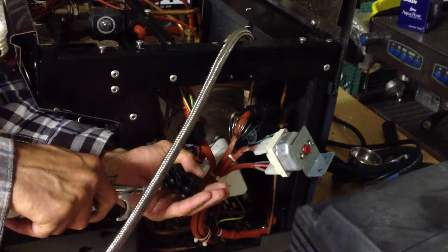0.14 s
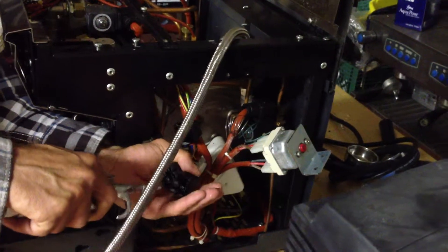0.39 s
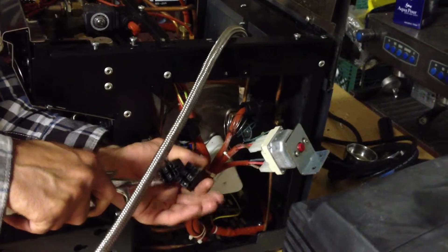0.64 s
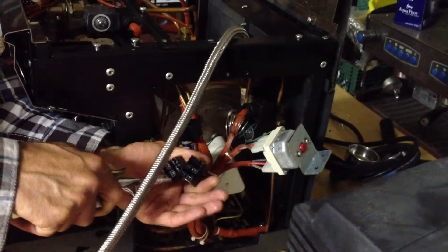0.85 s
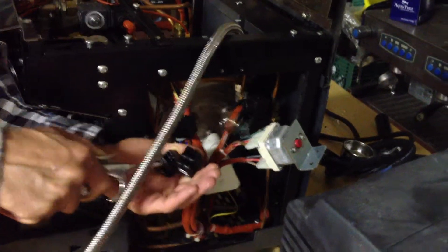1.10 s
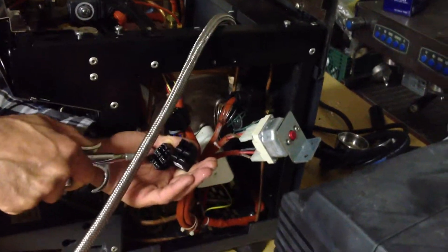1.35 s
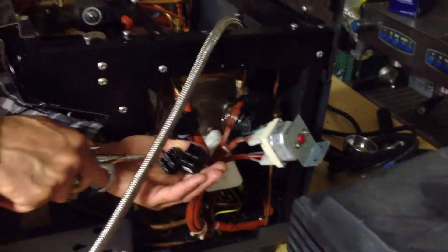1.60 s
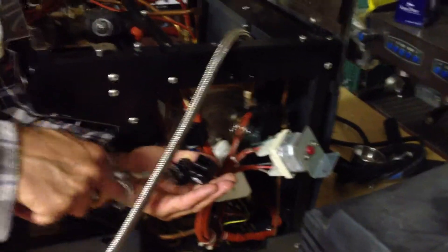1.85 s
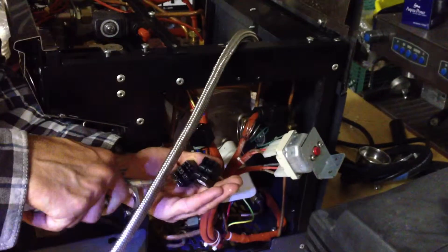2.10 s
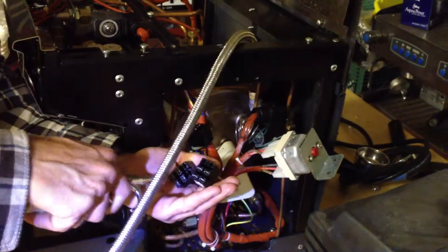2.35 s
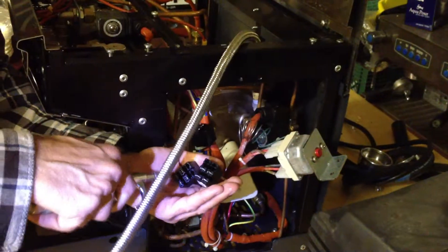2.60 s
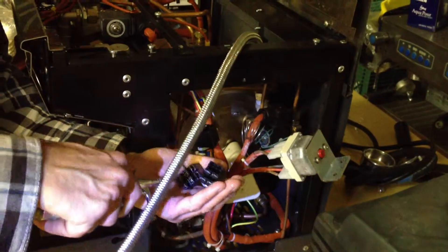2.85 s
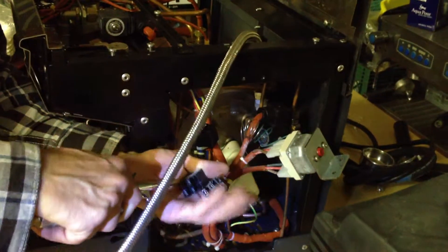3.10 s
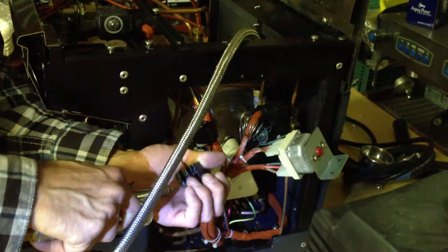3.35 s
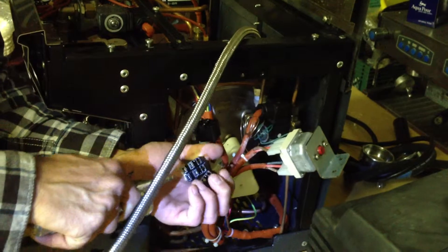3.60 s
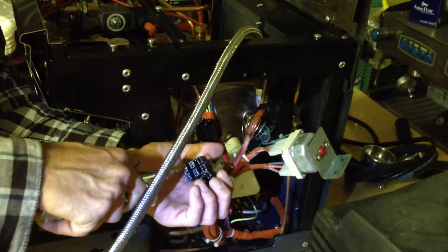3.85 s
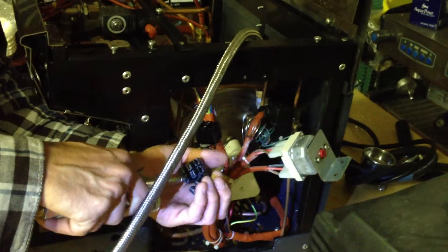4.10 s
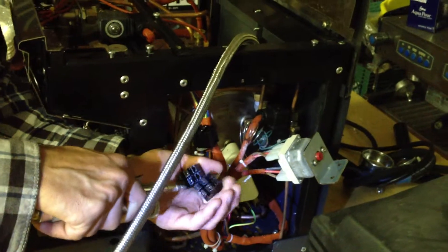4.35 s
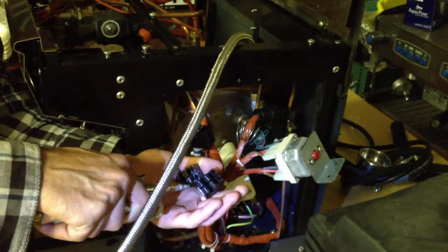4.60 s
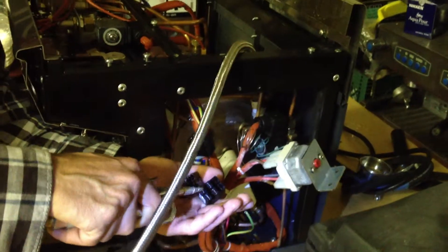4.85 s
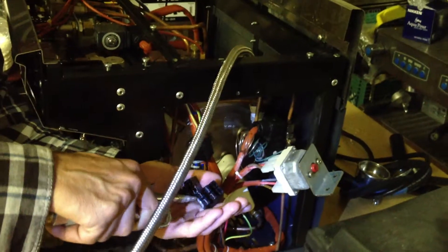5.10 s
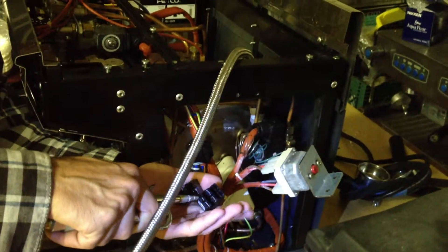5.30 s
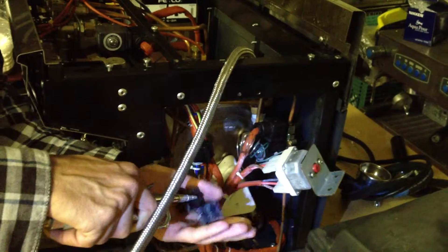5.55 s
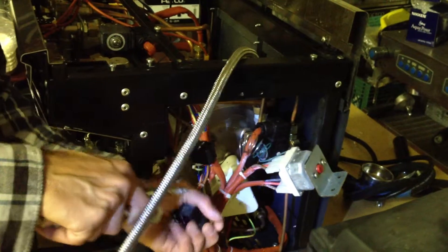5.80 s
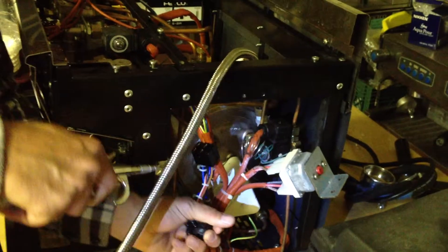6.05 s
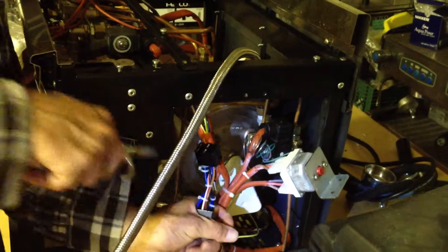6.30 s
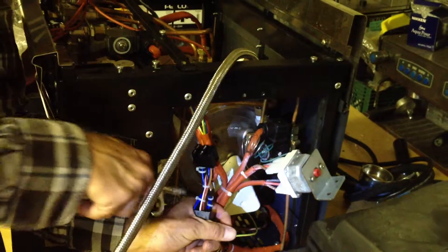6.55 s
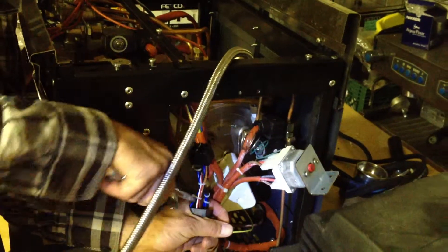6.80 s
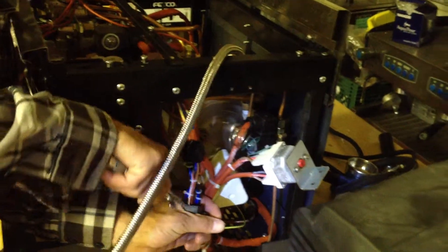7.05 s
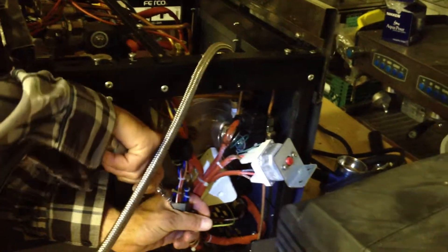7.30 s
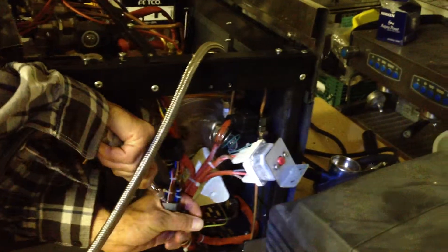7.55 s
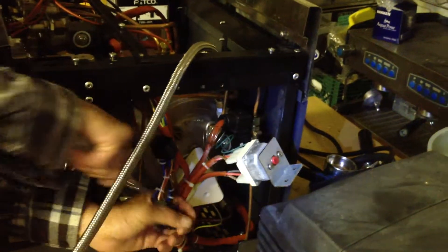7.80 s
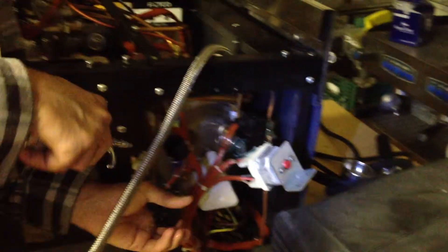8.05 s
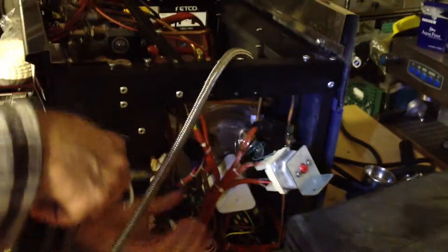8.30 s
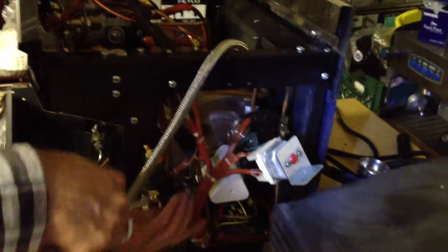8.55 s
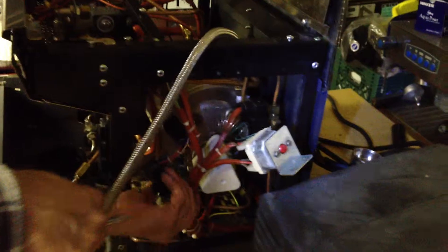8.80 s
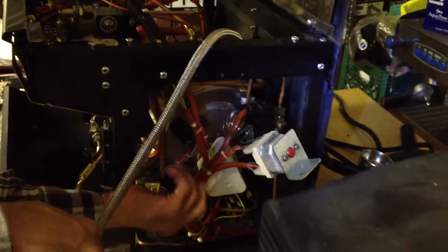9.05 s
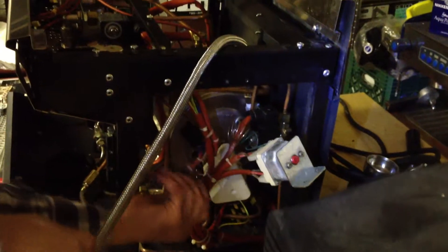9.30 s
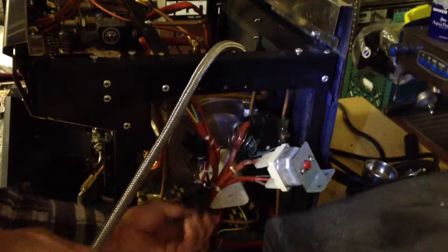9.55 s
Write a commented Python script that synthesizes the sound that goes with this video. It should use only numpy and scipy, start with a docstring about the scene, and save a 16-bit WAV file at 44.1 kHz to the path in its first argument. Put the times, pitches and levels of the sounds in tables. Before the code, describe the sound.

A workshop heard through one close mono microphone with automatic gain and little deep bass. Throughout, a compressor runs at constant speed, about forty-two knocks a second, fused into a coarse buzzing drone with throbbing rattle, ringing panels and faint high whines. From 0 s a blow gun sprays a small part with strong, bright, fluttering hiss, pushing the compressor back. Low gusts thump the microphone, and a short high whistle slips out around 0.7-0.95 s. From 2 to 5.5 s the jet comes in quick, uneven swells, some hollow and roaring, with crackly pops near 2.6-2.8 s and a broad surge about 4.9 s. Around 5.7-6.5 s it weakens and the rattle comes forward. Shorter spurts follow, with a breathy whistle at 6.8-7 s and sharp puffs at 7.5-7.8 s. The air fades out by about 8.5 s, leaving the clearer compressor knocking steadily until 9.7 s.

```python
"""Workshop: an air compressor knocks away steadily while a blow gun sprays a small hand-held part.
Compressor: harmonics of the shaft speed make the knock, over throbbing noise, ringing panels and thin whines.
Jet: coloured noises swell and change colour over edges and hollows, whistle now and then, die near the end.
Gusts: low noise lumps and tiny pops. A mono microphone with gain control ducks the compressor under the jet."""
import sys
import numpy as np
from scipy import signal
from scipy.io import wavfile
from scipy.ndimage import uniform_filter1d

SR = 44100
rng = np.random.default_rng(int(sys.argv[2]) if len(sys.argv) > 2 else 0)


def voltage_ratio(decibels):
    """Convert decibels (scalar or array-like) to amplitude ratios, 20 dB per decade."""
    exponent = np.asarray(decibels, float) / 20
    return 10 ** exponent


def inscribe(sig):
    """Save sig as 16-bit PCM at rate SR to the path in sys.argv[1].

    A 1-D sig is mono; a 2-D sig holds one channel per row.
    Samples are clipped to [-1, 1] before scaling.
    """
    pcm = np.round(np.clip(np.atleast_2d(sig).T, -1, 1) * 32767)
    wavfile.write(sys.argv[1], SR, pcm.astype(np.int16))


N = 426006
CONTROL_HZ = 100  # rate of slow control rows


def evened(x):
    """Scales to rms 1."""
    return x / np.sqrt(np.mean(x ** 2) + 1e-20)


def read_spectrum(points, hz):
    """Reads a spectrum on a log-frequency axis; -80 dB below its first point."""
    point_hz, level_db = np.transpose(points)
    return np.interp(np.log(hz + 1), np.log(point_hz + 1), level_db, left=-80)


def resonate(x, hz, width_hz):
    """Resonance: shifts hz down to zero, smooths twice (width_hz per pass), shifts back."""
    turn = np.exp(2j * np.pi * np.cumsum(hz * np.ones(len(x))) / SR)
    r = np.exp(-np.pi * width_hz / SR)
    low = signal.lfilter([1 - r], [1, -r], x / turn)
    low = signal.lfilter([1 - r], [1, -r], low)
    return 2 * (turn * low).real


def wander(corner_hz, count):
    """Slow random rows at CONTROL_HZ, rms 1 overall: white noise low-passed both ways."""
    raw = rng.standard_normal((N * CONTROL_HZ // SR + 2, count))
    b, a = signal.butter(1, np.clip(corner_hz / (CONTROL_HZ / 2), .001, .9))
    return evened(signal.filtfilt(b, a, raw, axis=0, padtype="even")).T


def spread(row):
    """Stretches a slow row to every sample."""
    return np.interp(np.arange(N) * CONTROL_HZ / SR, np.arange(len(row)), row)


def noise(spectrum, patchy_db, bins, frames, streaky_db=0.5):
    """Random short-time spectra with drifting patches and thin streaks from nearby echoes, rms 1."""
    hz = np.fft.rfftfreq(512, 1 / SR)
    real, imag, patches, streaks = rng.standard_normal((N // 128 + 5, 257, 4)).T
    patches = uniform_filter1d(uniform_filter1d(patches, size=bins, axis=0), size=frames, axis=1)
    streaks = uniform_filter1d(uniform_filter1d(streaks, size=2, axis=0), size=70, axis=1)
    field_db = read_spectrum(spectrum, hz)[:, None]
    field_db = field_db + patchy_db * evened(patches) + streaky_db * evened(streaks)
    spectra = (real + 1j * imag) * voltage_ratio(field_db)
    return evened(signal.istft(spectra, nperseg=512, noverlap=384)[1][:N])


def no_bass(x, hz):
    """Small sources radiate no bass."""
    return signal.sosfilt(signal.butter(4, hz, "high", fs=SR, output="sos"), x)


# shaft speed: time_s, speed_turns_per_s
SHAFT_SPEED = [(0.0, 41.801), (0.8, 41.821), (1.5, 41.79), (2.1, 41.766), (2.7, 41.823), (3.4, 41.844),
               (4.2, 41.819), (5.0, 41.801), (5.8, 41.82), (6.6, 41.831), (7.4, 41.842), (8.2, 41.846),
               (9.0, 41.869), (9.66, 41.869)]
# knock, a row per multiple 1, 2, 3 .. of shaft speed, before path gain and waver:
# shaded_db (rms, behind arm and hands), clear_db (rms, clear path)
KNOCK_ORDERS = [(-58, -58), (-50, -51), (-36, -38), (-37, -40), (-29, -30), (-37, -36), (-37, -38),
                (-35, -37), (-28, -34), (-39, -45), (-40, -46), (-39, -38), (-33, -34), (-39, -36),
                (-31, -32), (-38, -40), (-31, -31), (-25, -27), (-32, -30), (-29, -26), (-38, -33),
                (-33, -38), (-34, -40), (-37, -61), (-40, -39), (-40, -41), (-31, -37), (-34, -36),
                (-41, -38), (-40, -47), (-42, -45), (-46, -48), (-32, -36), (-35, -36), (-41, -49),
                (-38, -44), (-48, -52), (-49, -51), (-43, -42), (-41, -49), (-45, -54), (-39, -43),
                (-40, -41), (-39, -48), (-42, -46), (-47, -45), (-46, -48), (-39, -39), (-41, -46),
                (-39, -40), (-40, -40), (-35, -34), (-49, -53), (-44, -48)]
# arm and hands move across the compressor's path: time_s, clear_share_0_1, knock_db, rattle_db, panels_db
PATH = [(0, 0.01, -0.9, 1, -1), (5.6, 0, -1, -1.5, -0.5), (5.9, 0.1, -1, 1, 0.1),
        (6.25, 0.1, 2.5, 4.5, 0.5), (6.8, 0.14, -1.3, 1.5, 7), (7.9, 0.05, -0.4, 2, -2),
        (8.25, 0.5, -0.5, 0, 1), (8.5, 1, -0.5, -1.5, -1.5), (8.9, 0.9, 0.2, 0.4, 0.3), (9.1, 0.9, 0, 0, 5),
        (9.35, 1, -0.1, -1.5, -1), (9.66, 0.8, 0, 0, 4.5)]
# air and rattle, relative spectrum: freq_hz, density_db_per_hz
RATTLE_SPECTRUM = [(59, -37), (100, -19), (213, -14), (376, -8), (454, -13), (836, -5.5), (930, -12),
                   (1300, -10.5), (2200, -8.5), (2490, -11.5), (3640, -13.5), (4890, -19), (9980, -41),
                   (13700, -17), (15200, -29)]
# casing panels ringing in the rattle, before path gain, swell and throb:
# pitch_hz, width_hz (per smoothing pass), level_db (rms), drift_hz (about rms)
CASING_PANELS = [(2155, 76, -34.5, 8.8), (2270, 96, -30.5, 14), (3677, 60, -39.5, 8)]
# casing whines, before swell: pitch_hz, level_db (peak)
CASING_WHINES = [(2498, -45), (2611, -45), (2697, -43), (2799, -42), (2929, -40), (2972, -44), (3085, -41),
                 (3305, -38), (3408, -38), (3521, -38), (3661, -36), (4285, -46), (4522, -41)]


def compressor():
    """One sharp knock a turn through the casing, rattle that throbs with it, drifting panels, thin whines."""
    first_turns, rattle_base_db = .657, -22
    rebound_share, rebound_turns = .45, .4  # second, weaker blow: enters the phases only
    blow_phase_rad, scatter_rad = -1.9, .3  # a lurch down and up; parts and echoes scatter its orders
    slip_rad_per_order = .0045
    t = np.arange(N) / SR
    turns = first_turns + np.cumsum(np.interp(t, *np.transpose(SHAFT_SPEED))) / SR
    time_s, *columns = np.transpose(PATH)
    clear, knock_db, rattle_db, panels_db = (np.interp(t, time_s, c) for c in columns)

    shaded_db, clear_db = np.transpose(KNOCK_ORDERS)
    order = np.arange(len(KNOCK_ORDERS)) + 1
    # most scatter far from the main ring
    loose_rad = scatter_rad + np.clip(np.maximum((13 - order) / 6, (order - 32) / 8), 0, .8)
    phase = blow_phase_rad + loose_rad * rng.standard_normal(len(order))
    phase += np.angle(1 + rebound_share * np.exp(-2j * np.pi * order * rebound_turns))
    waver_db = wander(2.0, count=len(order))
    slip = wander(2.4, count=len(order))
    knock = np.zeros(N)
    for i, k in enumerate(order):
        level_db = shaded_db[i] + clear * (clear_db[i] - shaded_db[i]) + 0.78 * spread(waver_db[i])
        angle = 2 * np.pi * k * turns + phase[i] + slip_rad_per_order * k * spread(slip[i])
        knock += voltage_ratio(level_db) * np.cos(angle)

    throb = evened(1 + 0.6 * np.exp(-(turns % 1) / 0.29) + 0.037 * np.cos(6 * np.pi * turns))
    rattle = voltage_ratio(rattle_base_db + rattle_db) * noise(RATTLE_SPECTRUM, patchy_db=1.65, bins=6, frames=20)
    swells = wander(6, count=len(CASING_PANELS) + len(CASING_WHINES))
    drifts = wander(3, count=len(CASING_PANELS))
    white = rng.standard_normal(N)
    for (pitch_hz, width_hz, level_db, drift_hz), swell, drift in zip(CASING_PANELS, swells, drifts):
        ring = evened(resonate(white, pitch_hz + drift_hz * spread(drift), width_hz))
        rattle += voltage_ratio(level_db + panels_db + 1.7 * spread(swell)) * ring

    whine = np.zeros(N)
    for (pitch_hz, level_db), swell in zip(CASING_WHINES, swells[len(CASING_PANELS):]):
        tone = np.sin(2 * np.pi * (pitch_hz * t + rng.random()))
        whine += voltage_ratio(level_db + 2.5 * spread(swell)) * tone
    return np.sqrt(2) * voltage_ratio(knock_db) * knock + no_bass(throb * rattle, hz=146) + whine


# blow gun held on the part, before sweeps: time_s, hiss_db (nozzle; gain of the whole jet),
# small_ring_db, deep_ring_db (rings of small and deep hollows, relative to hiss)
JET_AIM = [(0, -0.5, -8.5, -8.5), (.5, -4.5, -4.5, -7.5), (.96, -11, -6, -5), (1.15, -4.5, -7.5, -9),
           (1.4, -0.5, -8, -10), (1.76, -10.5, -1.5, -2.5), (2.2, -6.5, -7.5, -11), (2.9, -8.5, -4.5, -8),
           (3.5, -7.5, -7, -10.5), (4.1, -7.5, -8, -8.5), (4.68, -8.5, -8.5, -10), (4.73, -9.5, -9, -5),
           (4.95, -11.5, -8.5, -6), (5.05, -11, -6.5, -9), (5.15, -10.5, -10, -4), (5.35, -7.5, -8, -5.5),
           (5.53, -5, -7, -3.5), (5.7, -15.5, -7.5, -9.5), (6.1, -12.5, -9.5, -17), (6.28, -11.5, -7, -6),
           (6.47, -14, -4, -3.5), (6.58, -8, -8, -10.5), (7.0, -7.5, -7.5, -6), (7.35, -11.5, -9, -6),
           (7.6, -14.5, -7.5, -3.5), (8.05, -14, -8.5, -11.5), (8.3, -18, -11, -13), (8.42, -17, -6, -12),
           (8.47, -34, 2, 0)]
# jet sweeps across an edge: peak_s, length_s (twice the rise from 1/e), swell_db,
# extra_ring_db (of the hollows, before lag)
EDGE_SWEEPS = [(0.057, 0.19, -1.5, 4), (0.27, 0.16, 2, 0.5), (0.397, 0.12, 1.5, 2.5),
               (0.585, 0.12, 6.5, -1.5), (0.872, 0.2, 6.5, -1), (1.135, 0.078, 5, 0.5),
               (1.257, 0.2, 2.5, 2), (1.593, 0.15, 5, 0.5), (1.864, .07, 8, 1.5), (2.014, 0.25, 5, 2),
               (2.255, 0.045, 10, 6.5), (2.362, 0.13, 6, 7), (2.514, 0.018, 4, 2), (2.605, 0.072, 8.5, 3),
               (2.74, 0.15, 8, 3.5), (2.993, 0.068, 4.5, 2.5), (3.123, 0.12, 10.5, 2),
               (3.292, 0.053, 8.5, 3), (3.378, 0.11, 5.5, 4.5), (3.613, 0.17, 7, 1), (3.825, 0.076, 7, 2),
               (4.045, 0.039, 7, 2), (4.315, 0.093, -0.5, 4.5), (4.365, 0.044, 6, 1.5),
               (4.505, 0.14, 3, 1.5), (4.718, 0.035, 5, 4), (4.863, 0.26, 11, 3.5), (5.163, 0.052, 6, 1),
               (5.28, 0.16, 8, 1.5), (5.49, 0.11, 1.5, -0.5), (6.732, 0.045, 4.5, -5),
               (6.837, 0.059, -2, 1), (6.914, 0.066, 3, 2), (7.08, .1, 1, -5.5), (7.356, 0.087, -1, 0),
               (7.48, 0.089, 2.5, -1), (7.54, 0.026, 8.5, -2), (7.69, .08, 7.5, 1), (7.817, .09, 9.5, 5),
               (8.096, 0.065, 0, 0.5), (8.32, 0.11, 2, 3.5)]
# relative spectra of the parts of the jet, each: freq_hz, density_db_per_hz
HISS_SPECTRUM = [(7500, -34), (9700, -7.5), (11000, 1.5), (13000, 2), (14600, 2), (15400, 0)]
SMALL_HOLLOW_SPECTRUM = [(5800, -29), (7000, -2.5), (8500, -1.5), (9400, -4), (11000, -11.5)]
DEEP_HOLLOW_SPECTRUM = [(4300, -21), (4850, -9.5), (5150, -4.5), (5600, -3), (6300, 0), (7000, -4.5),
                        (8300, -12)]
ROAR_SPECTRUM = [(100, 1.5), (300, 0), (1200, 0), (2200, 0), (2800, -0.5), (3400, 2), (4300, -1.5),
                 (6000, -8.5)]
# edge whistles: start_s, end_s, start_hz, end_hz, width_hz (per smoothing pass),
# level_db (relative to hiss, before fades)
EDGE_WHISTLES = [(.68, 0.757, 7600, 6300, 300, -8), (.77, .84, 11100, 11000, 60, -12),
                 (0.84, 0.95, 10880, 11520, 66, -1.5), (2.0, 2.11, 2650, 3000, 800, -10.5),
                 (3.34, 3.44, 3600, 3100, 900, -12), (6.794, 7.013, 6500, 6100, 500, -6),
                 (6.79, 6.945, 5800, 5500, 690, -4), (6.78, 6.95, 2680, 3300, 1800, -7),
                 (7.628, 7.856, 3740, 3300, 270, -17)]


def blow_gun():
    """Turbulent air: coloured noises follow the aim of the jet, swell at each edge and flutter together."""
    sweep_fall = 1.38  # a swell dies this many times slower than it rises
    small_lag, deep_lag, roar_lag = 0.57, 0.47, 0.35  # share of a swell each part does not follow
    roar_base_db, roar_with_ring = -5, 0.63  # relative to hiss; how far roar follows the hollows
    t = np.arange(N) / SR
    time_s, *columns = np.transpose(JET_AIM)
    hiss_db, small_db, deep_db = (np.interp(t, time_s, c) for c in columns)
    swell_db, ring_db = np.zeros((2, N))
    for peak_s, length_s, sweep_db, extra_ring_db in EDGE_SWEEPS:
        side_s = length_s * np.where(t > peak_s, sweep_fall, 1)
        shape = np.exp(-(2 * (t - peak_s) / side_s) ** 2)
        swell_db += sweep_db * shape
        ring_db += extra_ring_db * shape
    mean_ring_db = (small_db + deep_db) / 2 + ring_db
    roar_db = roar_base_db + roar_with_ring * mean_ring_db - roar_lag * swell_db
    small_db = small_db + ring_db - small_lag * swell_db
    deep_db = deep_db + ring_db - deep_lag * swell_db

    air = noise(HISS_SPECTRUM, patchy_db=1.5, bins=12, frames=30, streaky_db=2.5)
    air += voltage_ratio(small_db) * noise(SMALL_HOLLOW_SPECTRUM, patchy_db=1.7, bins=8, frames=30, streaky_db=1.7)
    air += voltage_ratio(deep_db) * noise(DEEP_HOLLOW_SPECTRUM, patchy_db=0.8, bins=8, frames=30, streaky_db=1.8)
    air += voltage_ratio(roar_db) * noise(ROAR_SPECTRUM, patchy_db=1.5, bins=6, frames=16, streaky_db=1.24)
    for start_s, end_s, start_hz, end_hz, width_hz, level_db in EDGE_WHISTLES:
        span = slice(round(start_s * SR), round(end_s * SR))
        turbulence = rng.standard_normal(SR // 2)[:span.stop - span.start]
        glide_hz = np.linspace(start_hz, end_hz, len(turbulence))
        tone = evened(resonate(turbulence, glide_hz, width_hz))
        air[span] += voltage_ratio(level_db) * tone * signal.windows.tukey(len(tone), .85)
    flutter_db = 0.86 * spread(wander(24, count=1)[0])
    return no_bass(air, hz=132) * voltage_ratio(hiss_db + swell_db + flutter_db)


# gusts of turned-back air that buffet the microphone: centre_s, length_s (between 1/e points),
# thump_db, crackle_db
AIR_GUSTS = [(0.027, 0.11, -14, -40), (0.242, 0.071, -14, -40), (0.586, 0.061, -10.5, -35),
             (0.878, 0.061, -15.5, -40), (1.366, 0.094, -10, -35), (1.61, 0.079, -17, -40),
             (1.86, 0.06, -17, -35), (2.263, 0.035, -13, -35), (2.605, 0.022, -6, -17),
             (2.631, 0.013, -2, -24), (2.77, 0.071, -19, -14), (2.778, 0.018, -5.5, -28),
             (3.143, 0.13, -12.5, -35), (4.89, 0.058, -15, -35), (7.542, 0.043, -26, -40)]
# wind noise, relative spectrum: freq_hz, density_db_per_hz
BUFFET_SPECTRUM = [(25, -14), (60, -10), (110, -8.5), (200, -2), (500, -7), (2500, -17.5)]


def gusts():
    """Ragged lumps of low wind noise with a crackle of tiny pops, over a faint steady draught."""
    pops_per_s, draught_db = 900, -33.0
    t = np.arange(N) / SR
    thump, crackle = np.zeros((2, N))
    for centre_s, length_s, thump_db, crackle_db in AIR_GUSTS:
        shape = np.exp(-(2 * (t - centre_s) / length_s) ** 4)
        thump += voltage_ratio(thump_db) * shape
        crackle += voltage_ratio(crackle_db) * shape
    ragged = voltage_ratio(2.4 * evened(uniform_filter1d(rng.standard_normal(N), size=160)))
    pops = (rng.random(N) < pops_per_s / SR) * rng.laplace(size=N)
    pops = evened(signal.sosfilt(signal.butter(2, [200, 3000], "band", fs=SR, output="sos"), pops))
    wind = noise(BUFFET_SPECTRUM, patchy_db=0.5, bins=3, frames=4, streaky_db=1.5)
    return (voltage_ratio(draught_db) + thump * evened(ragged)) * wind + crackle * pops


def scene():
    """One microphone feeds both channels."""
    mono = compressor() + blow_gun() + gusts()
    return np.array([mono, mono])


def roll_off(x):
    """The treble ends steeply here."""
    return signal.sosfilt(signal.butter(12, 16550, fs=SR, output="sos"), x)


def record(dry):
    """Bass cut, gain control that drops fast and recovers slowly, then a band limit."""
    threshold_db, duck_db_per_db, recovery_db_per_s, edge_hz = -14.5, 0.83, 21.9, 15330
    cut = signal.sosfilt(signal.butter(2, 100, "high", fs=SR, output="sos"), dry)
    power_db = 10 * np.log10(abs(uniform_filter1d(cut[0] ** 2, size=900)) + 1e-12)
    over_db = duck_db_per_db * np.maximum(power_db - threshold_db, 0)
    recovered_db = np.arange(N) * recovery_db_per_s / SR
    duck_db = np.maximum.accumulate(over_db + recovered_db) - recovered_db
    ducked = cut / voltage_ratio(uniform_filter1d(duck_db, size=400))
    low_pass = signal.firwin(801, edge_hz, window=("kaiser", 10), fs=SR)[None]
    mix = signal.oaconvolve(ducked, low_pass, "same")
    return roll_off(mix)


dry = scene()
out = record(dry)
inscribe(out)
```